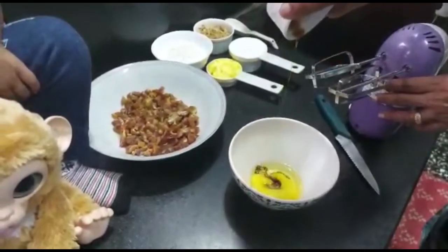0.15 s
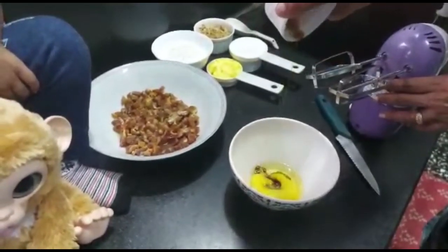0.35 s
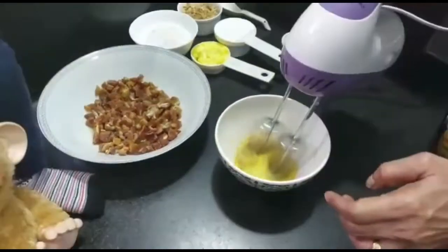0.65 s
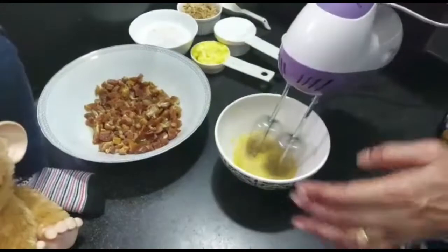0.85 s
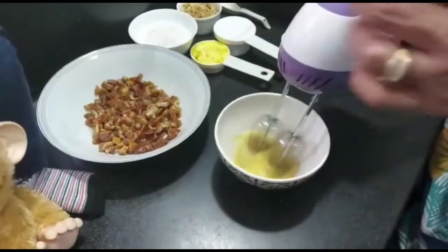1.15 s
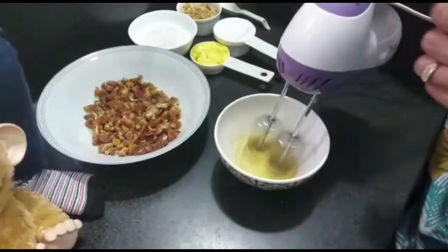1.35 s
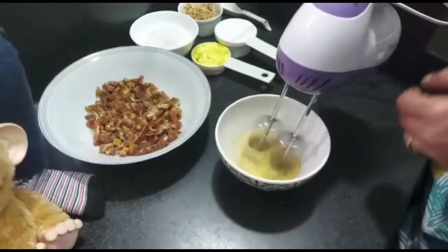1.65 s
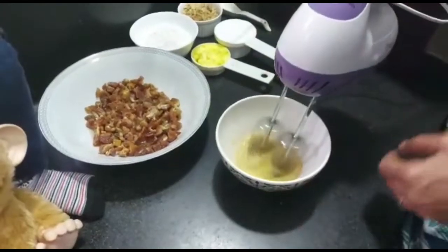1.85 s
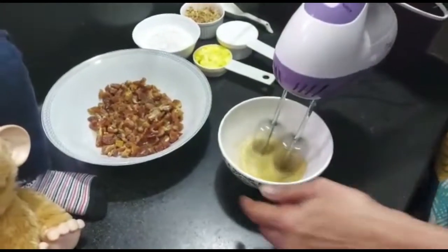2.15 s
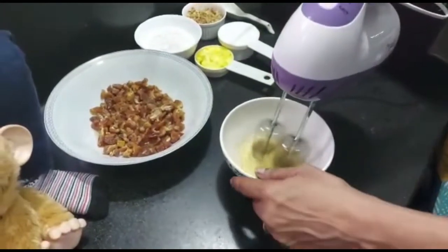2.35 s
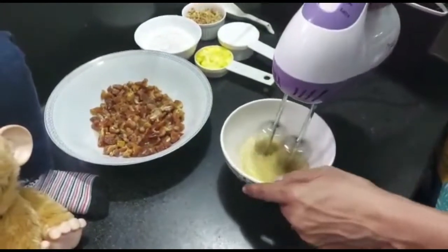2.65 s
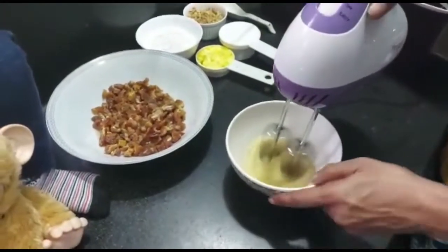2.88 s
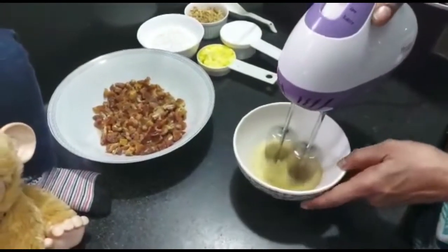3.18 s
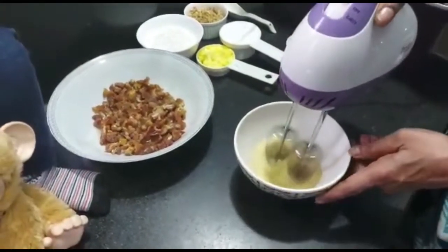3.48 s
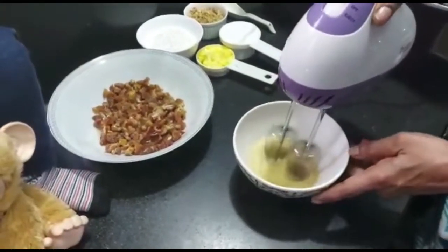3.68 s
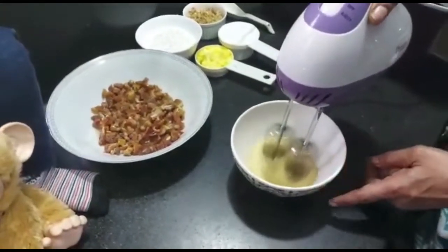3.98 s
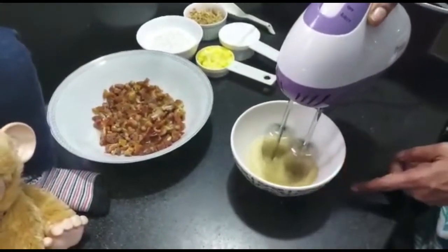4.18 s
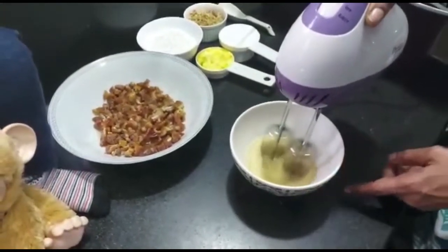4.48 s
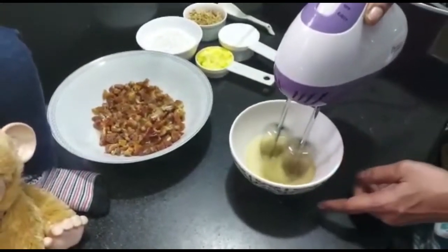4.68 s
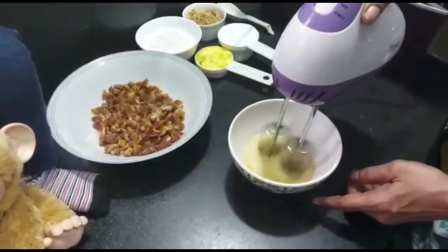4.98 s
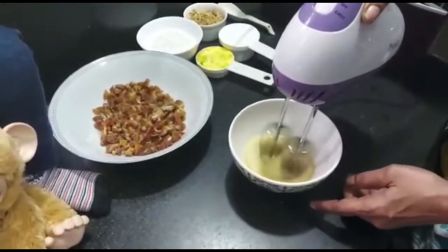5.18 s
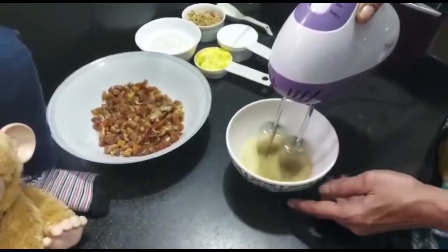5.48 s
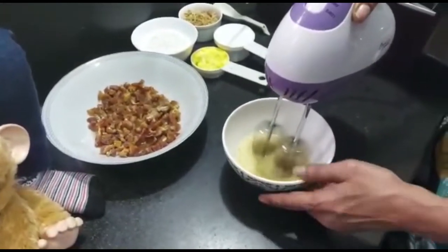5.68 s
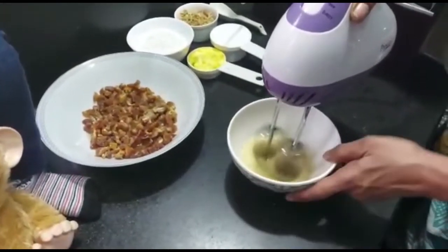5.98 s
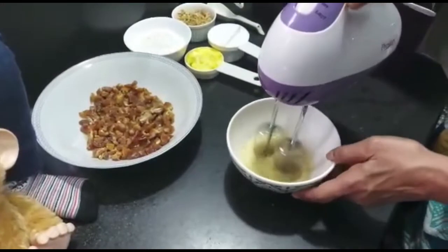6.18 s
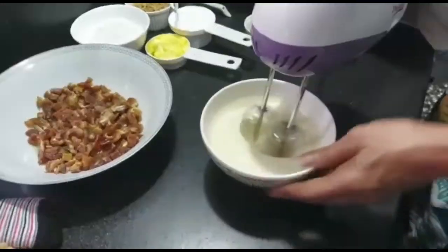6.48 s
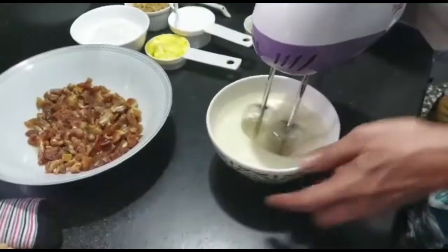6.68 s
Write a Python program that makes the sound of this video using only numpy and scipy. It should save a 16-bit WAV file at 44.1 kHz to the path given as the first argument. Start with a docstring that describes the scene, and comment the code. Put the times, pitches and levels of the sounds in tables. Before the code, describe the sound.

For the first 0.8 s a quiet kitchen holds a low, droning fan and faint air, with small clinks and drips at about 0.1 and 0.2-0.35 s and a dull worktop bump at 0.44 s. It dips nearly silent around 0.9 s. From 0.95 s a close electric hand mixer fades in: a hum near 355 Hz rising quickly to about 368 by 2 s, then creeping to 376, under bright fan hiss. Wire beaters tick in a dense rattle, cycling about seventeen times a second, over sloshing egg and low growl. Ceramic knocks cluster at 1.25-1.4, 1.8-2.0 and 2.3-3.1 s, then become sparse as the whir steadies. Sharp snaps stand out at 1.78, 5.24 and 6.15 s; around 6 s the rattle changes colour and low thumps grow. Treble leans right. After a gap near 6.67 s, fluttering froth noise with faint ticks fades in.

```python
"""An electric hand mixer beats egg in a ceramic bowl: a humming, hissing motor, wires that tick once a beater turn
at set angles, and a bowl that rings under drags and knocks. Hums are sines, hiss is shaped noise, rings are modes.
Before it comes a quiet room with a droning fan and small clinks; after it the mixer in thick froth, a fluttering
noise with three ticks, begins to fade in. Near-silent fades part the three shots. While the mixer runs the left
microphone port is shaded and hears almost no treble."""
import sys
import numpy as np
from scipy import signal
from scipy.fft import rfft, irfft, next_fast_len
from scipy.io import wavfile
from scipy.ndimage import uniform_filter1d, map_coordinates

SR = 44100
rng = np.random.default_rng(int(sys.argv[2]) if len(sys.argv) > 2 else 0)


def dump(signal):
    """Clip the signal to [-1, 1] and save it as 16-bit WAV at the path in sys.argv[1]."""
    limited = np.clip(np.atleast_2d(signal).T, -1, 1)
    pcm = np.round(limited * 32767).astype(np.int16)
    wavfile.write(sys.argv[1], SR, pcm)


N = 301203
T = np.arange(N) / SR  # seconds

# Armature speed. Each row: time in seconds, speed in turns a second.
ARMATURE_SPEED = [(1.2, 354.5), (1.6, 362.2), (2.0, 367.5), (2.4, 368.6), (2.8, 368.9), (3.2, 370.3),
                  (3.6, 371.1), (4.0, 371.8), (4.4, 372.9), (4.8, 373.8), (5.2, 374.5), (5.6, 375.6),
                  (6.0, 376.25), (6.4, 376.5)]
# Armature turns for one turn of the beaters.
GEAR_RATIO = 21.5
# Shaft tone. Each row: time in seconds, mean level in dB.
SHAFT_TONE = [(1.1, -50), (1.16, -42.5), (1.36, -36), (1.5, -40.5), (2.05, -45), (2.5, -38.5),
              (2.74, -41.5), (2.98, -40.5), (3.1, -40.5), (4.0, -39.5), (4.3, -37), (5.3, -36.5),
              (5.75, -35), (6.1, -36.5), (6.2, -40.5), (6.45, -39.5)]
# Overtones of the shaft tone. Each row: multiple of shaft speed, mean level in dB against the tone.
SHAFT_OVERTONES = [(1.5, -24), (2, -22)]
# Unsteady turning under uneven load. Each row: time in seconds, level waver in dB, phase waver in radians.
SHAFT_WAVER = [(1.2, 2, .4), (1.9, 2.8, .55), (3.0, 2.2, .45), (3.4, 1, .25), (4.5, .7, .2)]
# Whine of fan blades and commutator. Each row: multiple of shaft speed, mean dB at the start, mean dB at the end.
BLADE_WHINE = [(2, -72, -52), (9, -70, -57), (23, -58, -62), (24, -58, -56), (26, -62, -55), (27, -62, -60),
               (28, -66, -60), (36, -57, -60)]
# Hiss of the motor's cooling fan. Each row: time in seconds, level in dB.
COOLING_FAN = [(1.2, -39.5), (2.2, -38), (2.55, -37.5), (3.2, -39), (4.6, -38.5), (5.2, -39.5),
               (5.5, -40.5), (5.95, -38), (6.4, -43.5)]
# Hiss spectrum. Each row: frequency in Hz, relative density in dB per Hz.
HISS_SPECTRUM = [(1500, -33), (2500, -0.5), (3200, -2.5), (4300, -1), (5200, -3), (6100, -1.5),
                 (6700, -4.5), (7450, -6.5), (8700, -1.5), (9500, -8), (12000, -9), (15300, -10),
                 (16000, -29.5)]
# Motor shell resonances. Each row: frequency in Hz, width in Hz, relative level in dB.
SHELL_MODES = [(549, 41, 0), (1155, 53, 1.5), (1846, 157, 2), (2112, 120, -3.5), (2590, 56, 3),
               (2797, 140, -2), (3440, 82, -2.5), (3650, 57, 2)]
# Whirr heard while the motor gathers speed. Each row: frequency in Hz, width in Hz, relative level in dB.
EARLY_WHIRR = [(1430, 250, -5.5), (2200, 150, 2.5)]
EARLY_DB, EARLY_UNTIL_S, EARLY_FADE_DB_PER_S = -44, 1.87, 25
# Load on the beaters. Each row: time in seconds, mean slosh in dB, mean low growl in dB, mean rumble in dB,
# brightness of the ticks in relative dB.
BEATER_LOAD = [(1.22, -40, -45, -64, -14), (1.73, -41.5, -42, -59, -9), (2.21, -40, -42, -59.5, -15),
               (2.6, -38, -44, -62, -14), (2.89, -36.5, -42, -60.5, -14), (3.15, -41, -47, -58, -11.5),
               (3.75, -40.5, -47, -54, -9.5), (4.64, -39, -46, -60, -10), (4.82, -40, -47.5, -55, -12.5),
               (5.47, -40.5, -46.5, -53.5, -11), (5.92, -38.5, -46.5, -51, -7.5),
               (6.3, -41, -45.5, -53, -11), (6.45, -43, -49.5, -53, -11)]
# Slosh spectrum. Each row: frequency in Hz, relative density in dB per Hz.
SLOSH_SPECTRUM = [(250, -18), (420, -1.5), (560, -2), (700, -1.5), (850, -3.5), (1150, -2), (1500, -4.5),
                  (2200, -7.5), (3500, -24.5)]
# Growl spectrum. Each row: frequency in Hz, relative density in dB per Hz.
GROWL_SPECTRUM = [(70, -50), (130, -5.5), (200, -3), (310, 3), (420, -3.5), (600, -38)]
# Rumble spectrum. Each row: frequency in Hz, relative density in dB per Hz.
RUMBLE_SPECTRUM = [(25, -31), (45, -13), (62, 4.5), (100, -4), (160, -20.5)]

# Angle at which the leading wire strikes; it drifts with the load and slips when the mixer is shifted.
# Each row: time in seconds, angle in beater turns.
LEAD_ANGLE = [(1.03, .56), (1.3, .58), (1.47, .572), (1.8, .543), (2.1, .541), (2.57, .558), (2.8, .556),
              (3.15, .525), (3.62, .527), (3.9, .518), (4.77, .514), (5.85, .511), (5.92, .494),
              (6.03, .423), (6.14, .418), (6.3, .437)]
# Spells in which one wire strikes every turn. Each row: start in seconds, end in seconds, angle after the leading
# wire in turns, first and last strike in relative dB, scatter in dB, extra drive of the upper ring in dB.
WIRE_CONTACTS = [(.98, 1.52, 0, -24.5, -25, 0.7, 1.5), (1.53, 1.8, 0, -22.5, -24.5, -3.5, -3.5),
                 (1.81, 6.26, 0, -26.5, -24.5, 1.5, 0), (6.27, 6.6, 0, -26.5, -25.5, -1, 0),
                 (1.05, 1.6, .124, -32.5, -29, -1.5, -3), (1.61, 2.49, .124, -26, -29.5, 3, -1),
                 (2.5, 3.05, 0.2, -30.5, -28, 4.5, -1), (1.01, 2.3, .373, -27, -27.5, 1.5, -3),
                 (2.31, 3.03, .373, -29.5, -30, 0.5, 0), (2.34, 3.0, -.12, -29.5, -30, 1, -6),
                 (3.01, 3.45, -.1, -35, -38, 1, -8), (3.46, 3.95, -0.036, -25, -32, 1.5, -4),
                 (4.3, 4.9, -.1, -31, -33.5, 4.5, -6), (2.22, 2.6, -.25, -32, -33, 2, 5),
                 (2.88, 3.1, -.226, -26.5, -25, 1.5, -2), (3.12, 4.3, -.23, -26.5, -27.5, 0, 2),
                 (4.31, 6.02, -.262, -28, -25.5, 1.5, 3.5), (6.14, 6.23, -.25, -25, -26, 0, 3.5),
                 (2.97, 5.0, .238, -24.5, -24, 1.2, -2.5), (5.02, 5.86, .248, -24, -30, 0.5, 0.5),
                 (5.87, 6.26, 0.29, -29, -27.5, 2, 2.5), (6.28, 6.65, .267, -27.5, -32.5, -0.5, -1),
                 (3.8, 4.2, 0.57, -36, -31, 2, 1.5)]
# Ticks in the froth. Each row: time in seconds, relative level in dB.
FROTH_WIRE_TICKS = [(6.765, -36), (6.778, -41), (6.822, -43)]
# Lower ring of the wires. Each row: frequency in Hz, width in Hz, relative level in dB.
WIRE_MODES = [(4365, 960, -4), (4904, 540, 0.5), (5580, 530, -4), (6040, 265, 2), (6650, 353, -0.5),
              (7540, 640, -4.5)]
# Upper ring of the wires. Each row: frequency in Hz, width in Hz, relative level in dB.
UPPER_MODES = [(8720, 385, -5.5), (10100, 280, -8.5), (11300, 240, -13), (12300, 210, -9),
               (12960, 300, -16), (14400, 400, -17.5)]
# Upper ring once the mixer is tilted. Each row: frequency in Hz, width in Hz, relative level in dB.
TILTED_MODES = [(8570, 410, -1), (9160, 420, -0.5), (11700, 330, -8.5), (12600, 500, -23)]
TILT_S, TILT_TAKES_S = 5.95, 0.23
# Sharp bright contacts of wire on glaze. Each row: time in seconds, relative level in dB.
GLAZE_SNAPS = [(1.2461, -30), (1.4272, -32), (1.5454, -30), (1.7818, -20.5), (5.244, -20.5), (6.155, -19.5),
               (6.286, -34), (6.343, -29), (6.4557, -33.5)]
SNAP_GAIN_DB, SNAP_T60_S, SNAP_FROM_HZ = -0.5, 0.014, 7200

# Angles within each beater turn. Each row: time in seconds, drag on the bowl in turns, thump in turns.
BOWL_ANGLES = [(2.95, .95, .56), (3.1, .8, .54), (5.9, .8, .53), (6.1, .7, .44)]
# Beaters against the bowl. Each row: time in seconds, ring of the drag in relative dB, thump in dB,
# extra ring of the main mode in dB.
BOWL_DRAG = [(1.2, -57, -67, 4), (1.27, -38, -62, 1.5), (1.36, -41, -61, 2), (1.39, -46, -65, -3),
             (1.8, -41.5, -60, 1), (2.35, -44.5, -64, -2), (2.5, -45, -68, -1.5), (3.07, -37.5, -66, 2),
             (3.13, -50, -62, -5), (3.7, -41.5, -63, -11), (4.5, -46.5, -63, -16),
             (5.1, -42.5, -63.5, -14.5), (5.4, -51.5, -56, -16), (5.9, -50.5, -64, -10),
             (6.15, -44, -61, -11), (6.21, -59, -43.5, -12), (6.5, -49.5, -47.5, -4)]
# Ceramic bowl modes. Each row: frequency in Hz, width in Hz, relative level in dB.
BOWL_MODES = [(660, 45, -3.5), (773, 30, -2.5), (942, 24, 3), (1085, 37, 2.5), (1164, 21, 1.5),
              (1330, 25, 2.5), (1840, 79, -6), (2540, 80, -11)]
# Harder knocks on the bowl. Each row: time in seconds, relative level in dB, pitch that rings most in Hz.
BOWL_KNOCKS = [(1.258, -30, 947), (1.267, -29, 1040), (1.282, -26.5, 948), (1.339, -28, 944),
               (1.359, -28, 920), (1.384, -29, 1126), (1.805, -23.5, 941), (1.818, -24, 950),
               (1.865, -29, 940), (1.879, -31, 972), (1.983, -32, 929), (2.041, -30, 1070),
               (2.265, -32.5, 922), (2.396, -31.5, 952), (2.455, -30.5, 943), (2.492, -32, 937),
               (2.538, -29, 883), (2.594, -23, 786), (2.624, -32, 917), (2.654, -26.5, 925),
               (2.668, -23, 943), (2.728, -27.5, 906), (2.74, -26.5, 906), (2.787, -30.5, 1146),
               (2.809, -31, 950), (2.855, -30, 934), (2.912, -28, 923), (2.926, -31, 923),
               (2.969, -30, 930), (3.014, -27.5, 1088), (3.027, -24, 937), (3.083, -29.5, 938),
               (3.483, -30.5, 791), (3.661, -25.5, 1175), (3.836, -34.5, 1100), (4.588, -28, 820),
               (4.643, -32, 1164), (4.874, -28.5, 778), (5.09, -31, 1160), (6.068, -29.5, 746)]
DRAG_GAIN_DB, KNOCK_GAIN_DB = 24, 1.5  # from level in the tables to force of the blow
KNOCK_RISE_S, KNOCK_SPREAD_HZ = 0.0033, 133  # soft contact; range of modes that a knock favours
KNOCK_DAMPING = 1.24  # the wire pressed on the bowl widens its modes
# The bowl bumps the worktop. Each row: time in seconds, peak in dB.
WORKTOP_BUMPS = [(1.248, -44), (3.589, -49)]
BUMP_HZ, BUMP_T60_S = 74, 0.15

# Froth spectrum. Each row: frequency in Hz, relative density in dB per Hz.
FROTH_SPECTRUM = [(35, -64), (60, -29), (283, -3.5), (358, 0), (453, -11.5), (1270, -4), (2520, -16),
                  (6600, -11.5), (9390, -35), (14700, -25), (16500, -48)]
# Shaded left port against the right. Each row: frequency in Hz, level in dB.
PORT_SHADE = [(60, -15.5), (95, -12.5), (150, -4), (240, -0.5), (380, -3.5), (600, -0.5), (950, -2.5),
              (1500, -4.5), (2380, -7.5), (3770, -13.5), (5980, -31), (9470, -43), (15000, -16.5)]
# Left-right likeness of the mixer. Each row: frequency in Hz, correlation from -1 to 1.
MIXER_LIKENESS = [(60, 0.22), (150, 0.95), (350, 0.87), (700, 0.99), (1500, 0.25), (4000, 0.057)]

# Room drone. Each row: time in seconds, mean level in dB.
DRONE_LEVEL = [(0.0, -42.5), (0.3, -43.5), (0.6, -42.5), (0.7, -42.5)]
# Low room resonances. Each row: frequency in Hz, width in Hz, relative level in dB.
ROOM_MODES = [(55, 30, -11.5), (101.5, 18, -11.5), (145, 22, -6.5), (186, 33, -7.5), (297, 22, -5.5),
              (406, 69, -15), (483, 40, -12), (542, 30, -18.5)]
# Steady tones of the room fan. Each row: frequency in Hz, mean level in dB.
ROOM_FAN_HUM = [(59, -54), (102, -49.5), (172.5, -41), (199, -44.5), (312, -49), (485, -54), (549, -61)]
# Air in the room. Each row: frequency in Hz, relative density in dB per Hz.
AIR_SPECTRUM = [(100, -30), (600, -3), (900, -10.5), (1300, -15), (2500, -17.5), (4500, -25), (5800, -22),
                (6300, -13.5), (7000, -10.5), (7700, -25), (10000, -26), (14500, -31), (15500, -39)]
# Small clinks and drips. Each row: time in seconds, opening level in dB, base pitch in Hz,
# rise as a share of the pitch, t60 in seconds, noise share from 0 to 1.
CLINKS_AND_DRIPS = [(0.097, -43, 2320, .12, 0.05, 0.56), (.097, -56, 9000, 0, .012, 1),
                    (.109, -47, 2150, 0, 0.044, 0.6), (0.111, -48, 8300, 0.075, .025, 0.6),
                    (.2234, -44, 5800, 0, .03, 0.47), (.2255, -44.5, 8900, 0.05, 0.03, 0.7),
                    (.249, -56, 9200, 0, .02, .8), (0.2767, -44.5, 2060, 0.74, 0.06, 0.3),
                    (.3, -50, 2980, .05, 0.066, 0.6), (0.336, -55, 3280, 0.17, 0.073, .6),
                    (.293, -48, 5800, 0, 0.025, 0.4), (.293, -57, 10500, 0, .012, 1),
                    (.3466, -42, 14900, 0, 0.02, 0.5)]
# A dull bump on the worktop: time in seconds, peak in dB, pitch in Hz, t60 in seconds.
DULL_BUMP = 0.437, -33, 99, 0.2
# Left-right likeness of the room. Each row: frequency in Hz, correlation from -1 to 1.
ROOM_LIKENESS = [(60, 0.9), (180, 0.98), (550, 0.65), (1650, -0.24), (4970, 0.04), (15000, 0.11)]
# Balance of the room. Each row: frequency in Hz, left against right in dB.
ROOM_BALANCE = [(60, 2), (180, 0.5), (550, 0.5), (1650, 4.5), (4970, -3.5), (15000, -1.5)]

# Moments of silence between the shots, in seconds.
SHOT_CUTS = .89, 6.67
# Fader moves. Each row: start in seconds, fade-in in seconds, end in seconds, fade-out in seconds.
SHOT_FADES = [(-1, .1, 0.837, 0.15), (0.9538, 0.23, 6.623, 0.13), (6.728, 0.34, 8, .1)]
FADE_STEP = 0.055  # gain 0-1 at which a fade-in opens
TOP_HZ = 16650

# Angle of the beaters, in turns.
TURNS = np.cumsum(np.interp(T, *np.transpose(ARMATURE_SPEED))) / SR / GEAR_RATIO


def motor():
    """The armature hums at shaft speed; its fan and brushes hiss and shake the shell, throbbing once a shaft turn."""
    shaft = 2 * np.pi * GEAR_RATIO * TURNS
    waver_db, waver_phase = curves(SHAFT_WAVER)
    level = amp(curves(SHAFT_TONE)[0] + waver_db * wobble(38))
    tone = np.sin(shaft + waver_phase * wobble(30))
    tone += sum(amp(db + 1.9 * wobble(14)) * np.sin(k * shaft) for k, db in SHAFT_OVERTONES)
    whine = sum(amp(a + (b - a) * T / T[-1]) * np.sin(k * shaft) for k, a, b in BLADE_WHINE)
    hum = level * tone + amp(2.4 * wobble(5.6)) * whine

    throb = amp(.8 * wobble(60)) * (1 + .2 * np.sin(shaft))
    air = patchy(rush(colour(HISS_SPECTRUM), MIXER_LIKENESS), depth_db=2.5)
    shell = patchy(rush(modes(SHELL_MODES), MIXER_LIKENESS), depth_db=4.5)
    hiss = amp(curves(COOLING_FAN)[0]) * throb * (air + amp(-6.0) * shell)
    early_db = EARLY_DB - EARLY_FADE_DB_PER_S * np.maximum(T - EARLY_UNTIL_S, 0)
    hiss += amp(early_db) * throb * rush(modes(EARLY_WHIRR), MIXER_LIKENESS)
    return hum + hiss + load()


def load():
    """The beaters slosh through the egg in time with their turning, over a low growl and a rumble."""
    slosh_db, growl_db, rumble_db = curves(BEATER_LOAD)[:3]
    once_a_turn = 1.1 * np.sin(2 * np.pi * (TURNS - .6))
    four_wires = 1.5 * np.sin(8 * np.pi * (TURNS - .3))
    swell_db = 1.23 * wobble(50) + once_a_turn + four_wires
    slosh = amp(slosh_db + swell_db) * patchy(rush(colour(SLOSH_SPECTRUM), MIXER_LIKENESS), depth_db=2.0)
    growl = amp(growl_db + 0.62 * wobble(30)) * rush(colour(GROWL_SPECTRUM), MIXER_LIKENESS)
    rumble = amp(rumble_db + 2.3 * wobble(22)) * rush(colour(RUMBLE_SPECTRUM), [(60, 0.34)])
    return slosh + growl + rumble


def wire_strikes():
    """Times, levels and upper-ring boosts of the strikes: each wire meets the bowl at its own angle of the turn."""
    rows = [(s, db, 0) for s, db in FROTH_WIRE_TICKS]
    lead_times, turn = passes(curves(LEAD_ANGLE)[0]), np.arange(1, 130)
    known = lead_times > 0
    for start, end, after, first_db, last_db, scatter_db, top_db in WIRE_CONTACTS:
        at = np.interp(turn + after, turn[known], lead_times[known])
        luck = rng.standard_normal((len(at), 2))
        size = np.interp(at, [start, end], [first_db, last_db]) + scatter_db * luck[:, 1]
        strikes = np.transpose([at + .0003 * luck[:, 0], size, np.full(len(at), top_db)])
        rows += list(strikes[(at > start) & (at < end)])
    # the loose beater shafts also rattle faintly at any angle
    rows += [(1 + 5.6 * a, -45 + 7.4 * b, 0) for a, b in rng.random((260, 2))]
    return np.transpose(rows)


def ticks():
    """Each strike bounces twice, scrapes for a few ms and rings in the steel and the shell."""
    times, sizes, top = wire_strikes()
    bounce = .0013 + .0005 * rng.random(len(times))  # seconds
    scrape = bursts(times, sizes - 5, t60=0.028)

    def blow(db):
        hits = spikes(times, db + 13.0) - spikes(times + bounce, db + 7.0)
        hits += spikes(times + 2.2 * bounce, db - 0.5)
        return hits * [[1], [-1]]

    def steel_and_shell(hz):
        return modes(WIRE_MODES)(hz) + amp(-7.5) * modes(SHELL_MODES)(hz)

    def broad_edge(hz):
        return (1j * hz / 3300) ** 3 / (1 + 1j * hz / 3300) ** 3 / (1 + 1j * hz / 8000)

    strike, upper = blow(sizes) + scrape, blow(sizes + top) + scrape
    tilt = np.clip((T - TILT_S) / TILT_TAKES_S + .5, 0, 1)
    ring = pair(strike, steel_and_shell, MIXER_LIKENESS)
    ring += pair(upper * (1 - tilt), modes(UPPER_MODES), MIXER_LIKENESS)
    ring += pair(upper * tilt, modes(TILTED_MODES), MIXER_LIKENESS)
    edge = amp(curves(BEATER_LOAD)[3]) * pair(strike, broad_edge, MIXER_LIKENESS)
    return amp(10.5) * (ring + edge) + snaps()


def snaps():
    """Wire snapping on glaze: very short noise bursts through a steep high-pass."""
    s, db = np.transpose(GLAZE_SNAPS)
    sharp = bursts(s, db + SNAP_GAIN_DB, t60=SNAP_T60_S)
    return pair(sharp, lambda hz: (1j * hz / (SNAP_FROM_HZ + 1j * hz)) ** 3, MIXER_LIKENESS)


def bowl():
    """Once a turn a beater drags on the bowl and rings it; at another angle it thumps through the worktop."""
    ring_db, thump_db, main_db = curves(BOWL_DRAG)
    drags, thumps = (at[at > 0] for at in map(passes, curves(BOWL_ANGLES)))
    blows = bursts(drags, 1.4 * rng.standard_normal(len(drags)), t60=0.066)
    blows += 0.22 * rng.standard_normal((2, N))  # steady rubbing between the drags
    blows = amp(ring_db + DRAG_GAIN_DB) * blows
    out = pair(blows, modes(BOWL_MODES), MIXER_LIKENESS)
    out += pair(blows * amp(main_db), modes(BOWL_MODES[2:3]), MIXER_LIKENESS)
    add_knocks(out)
    t = T[:SR // 8]
    for s, db in WORKTOP_BUMPS:
        add_at(out, s, amp(db - 60 * t / BUMP_T60_S) * np.sin(2 * np.pi * BUMP_HZ * t))
    push = spikes(thumps, 1.5 * rng.standard_normal(len(thumps)))
    thump = filtered(push, lambda hz: -modes([(80, 70, 0), (150, 120, -4)])(hz) / (1 + 1j * hz / 400))
    return out + amp(thump_db) * unit(thump)


def add_knocks(out):
    """A harder knock sets off decaying sines at the bowl's modes, strongest near the favoured pitch."""
    t, (hz, width, level_db) = T[:SR // 8], np.transpose(BOWL_MODES)[..., None]
    for s, db, most_hz in BOWL_KNOCKS:
        luck = rng.standard_normal((3, len(BOWL_MODES), 1))
        favoured = np.exp(-((hz - most_hz) / KNOCK_SPREAD_HZ) ** 2)
        share = np.maximum(favoured, 0.23 * amp(level_db)) * amp(luck[0])
        swing = share * np.exp(-np.pi * KNOCK_DAMPING * width * t) * (1 - np.exp(-t / KNOCK_RISE_S))
        shift = most_hz / hz[np.argmin(abs(hz - most_hz))]  # the point of contact detunes the bowl a little
        phase = 2 * np.pi * shift * hz * t + 3 * luck[1]
        sides = [np.sum(swing * np.sin(phase + side * .3 * luck[2]), 0) for side in (1, -1)]
        add_at(out, s, amp(db + KNOCK_GAIN_DB) * np.array(sides))


def froth():
    """The mixer in thick froth: a shaped noise whose level flutters."""
    return amp(-30.5 + 2.2 * wobble(60)) * rush(colour(FROTH_SPECTRUM), MIXER_LIKENESS)


def shaded(x):
    """The shaded left port loses its treble and hears the mixer 0.23 ms later."""
    def ports(hz):
        left = amp(along(PORT_SHADE, hz))
        late = np.exp(-2j * np.pi * hz * .00023)
        return np.array([left * late, np.ones_like(hz)]) * 2 / (1 + left)
    return filtered(x, ports)


def kitchen():
    """A fan drones in the room's low resonances over a thin whistle of air; small things clink and drip."""
    low_modes = lambda hz: modes(ROOM_MODES)(hz) / (1 + (hz / 900) ** 4)
    drone = amp(curves(DRONE_LEVEL)[0] + 0.7 * wobble(14.1)) * rush(low_modes, ROOM_LIKENESS)
    for hz, db in ROOM_FAN_HUM:
        drone += amp(db + 1.1 * wobble(13.4)) * np.sin(2 * np.pi * hz * T + 0.31 * wobble(9.2))
    at, bump_db, bump_hz, t60 = DULL_BUMP
    since = np.maximum(T - at, 0)
    bump = amp(bump_db - 60 * since / t60) * np.sin(2 * np.pi * bump_hz * since)
    air = amp(-53) * rush(colour(AIR_SPECTRUM), ROOM_LIKENESS)
    balance = lambda hz: amp(along(ROOM_BALANCE, hz) * [[.5], [-.5]])
    return filtered(drone + bump + air + clinks(), balance)


def clinks():
    """Each clink or drip is a dying tone, some rising in pitch, blended with noise around that pitch."""
    out, t = np.zeros((2, N)), T[:SR // 10]
    for s, db, hz, rise, t60, share in CLINKS_AND_DRIPS:
        glide = rise * (t - 0.01 * (1 - np.exp(-t / 0.013)))  # the pitch rises, then settles
        tone = np.sin(2 * np.pi * hz * (t + glide)) * amp(2.7 * wobble(250)[:len(t)])
        edges = np.clip([hz * 0.81, hz * 1.3], 50, 20000)
        band = signal.butter(2, edges, "bandpass", fs=SR, output="sos")
        fuzz = unit(signal.sosfilt(band, rng.standard_normal((2, len(t)))))
        add_at(out, s, amp(db - 60 * t / t60) * ((1 - share) * tone + share * fuzz))
    return out


def amp(db):
    """Gain of a level in dB."""
    return 10 ** (np.asarray(db) / 20)


def unit(x):
    """x scaled to rms 1."""
    return x / np.sqrt(np.mean(x ** 2) + 1e-20)


def along(points, hz):
    """Values read from (Hz, value) points on a log frequency axis."""
    f, v = np.transpose(points)
    return np.interp(np.log(hz + 1), np.log(f + 1), v)


def curves(rows):
    """One value per sample for each column after the time."""
    s, *columns = np.transpose(rows)
    return [np.interp(T, s, column) for column in columns]


def wobble(rate):
    """A smooth random curve, rate knots a second."""
    return map_coordinates(rng.standard_normal(int(N * rate / SR) + 4), [T * rate])


def passes(angle):
    """Times at which the beaters pass an angle, once a turn."""
    return np.interp(np.arange(1, 130), TURNS - angle, T, np.nan, np.nan)


def spikes(times, db):
    """One sample of the given level at each time."""
    return np.bincount(np.round(times * SR).astype(int), amp(db), N)[:N]


def bursts(times, db, t60):
    """Two unrelated trains of noise bursts that start sharply and die away."""
    decay = amp(-60 * T[:SR // 10] / t60)
    return signal.oaconvolve(spikes(times, db), decay)[:N] * rng.standard_normal((2, N))


def add_at(out, s, sound):
    """Mixes a short sound into out from s seconds on."""
    out[:, round(s * SR):][:, :sound.shape[-1]] += sound


def filtered(x, response):
    """x times a complex response of frequency."""
    m = next_fast_len(N + SR // 4, True)
    return irfft(rfft(x, m) * response(np.fft.rfftfreq(m, 1 / SR)), m)[..., :N]


def colour(spectrum):
    """Response of a (Hz, dB) spectrum."""
    return lambda hz: amp(along(spectrum, hz))


def modes(table):
    """Causal response of a set of resonances, with alternating signs."""
    def response(hz):
        return sum((-1) ** k * amp(db) * 1j * hz * width / (centre ** 2 - hz * hz + 1j * hz * width)
                   for k, (centre, width, db) in enumerate(table))
    return response


def pair(x, response, alike):
    """Left and right from two signals through one response, blended to the likeness table."""
    def mid_and_side(hz):
        turn = np.arccos(np.clip(along(alike, hz), -1, 1)) / 2
        return response(hz) * np.array([np.cos(turn), np.sin(turn)])
    mid, side = filtered(x, mid_and_side)
    return np.array([mid + side, mid - side])


def rush(response, alike):
    """Stereo noise of rms 1."""
    return unit(pair(rng.standard_normal((2, N)), response, alike))


def patchy(x, depth_db):
    """x with patches of random gain, about 130 Hz by 60 ms, back at rms 1."""
    z = signal.stft(x, nperseg=1024)[2]
    field = uniform_filter1d(rng.standard_normal(z.shape[1:]), size=3, axis=0)
    field = uniform_filter1d(field, size=5, axis=1)
    return unit(signal.istft(z * amp(depth_db * unit(field)), nperseg=1024)[1][:, :N])


def scene():
    """The room, the mixer in egg and the mixer in froth follow one another."""
    mixer = shaded(ticks() + np.where(T < SHOT_CUTS[1], motor() + bowl(), froth()))
    return np.where(T < SHOT_CUTS[0], kitchen(), mixer)


def record(dry):
    """Fades between the shots, the microphone's bass and treble roll-off, then the band limit."""
    fader = np.zeros(N)
    for start, rise, end, fall in SHOT_FADES:
        ramp = np.minimum(FADE_STEP + (T - start) / rise, (end - T) / fall)
        fader += (T > start) * np.clip(ramp, 0, 1)

    def microphone(hz):
        return (hz < TOP_HZ) / (1 + (hz / 15850) ** 70) / (1 + (36 / (hz + 1)) ** 4)
    return filtered(dry * fader, microphone)


dry = scene()
out = record(dry)
dump(out)
```